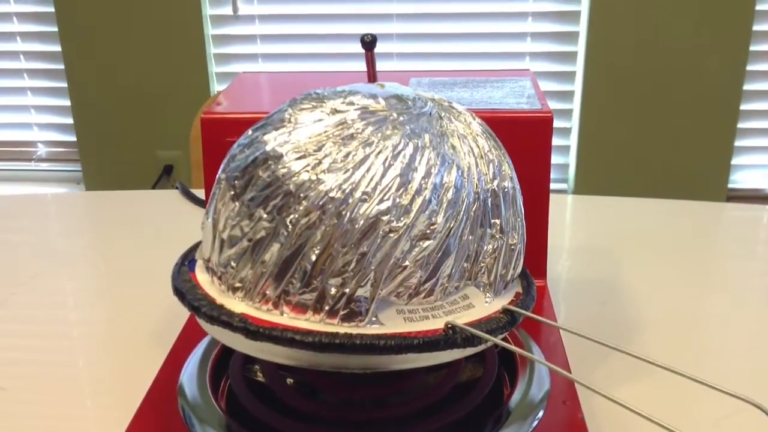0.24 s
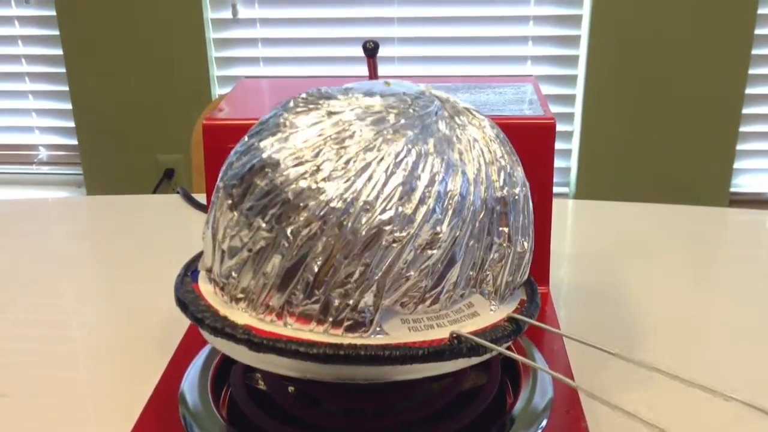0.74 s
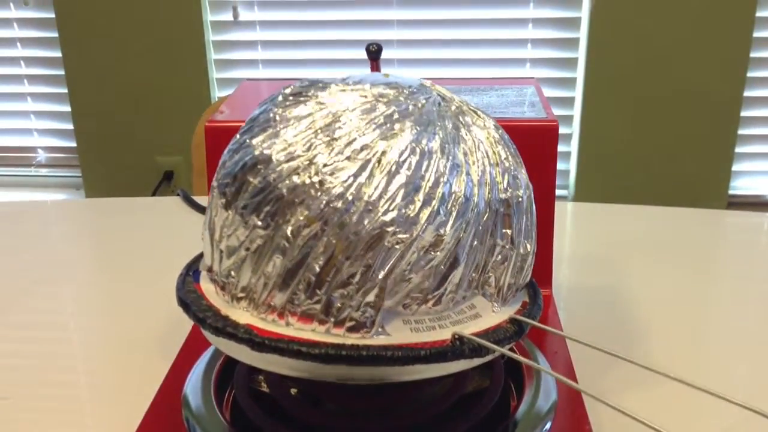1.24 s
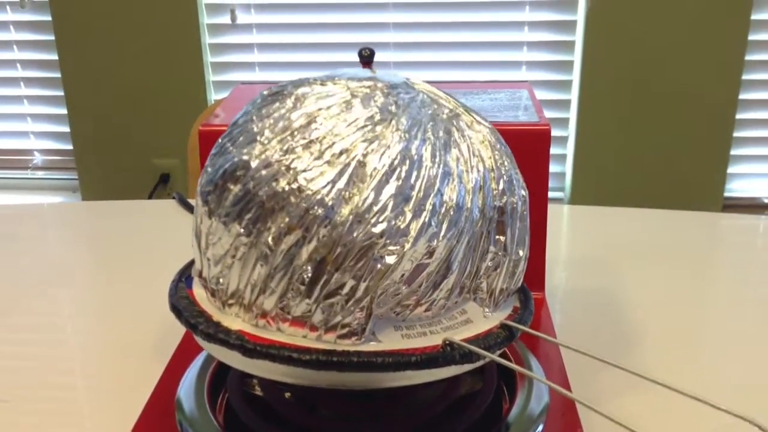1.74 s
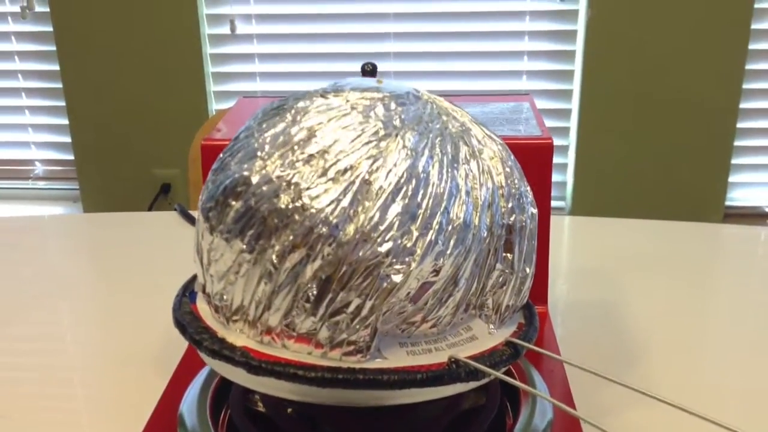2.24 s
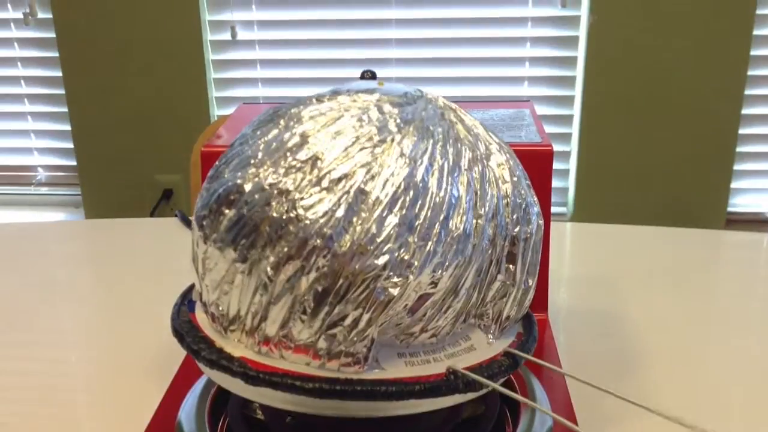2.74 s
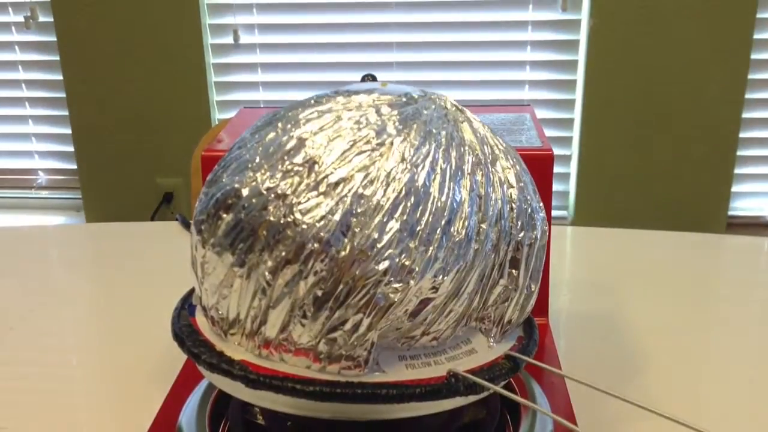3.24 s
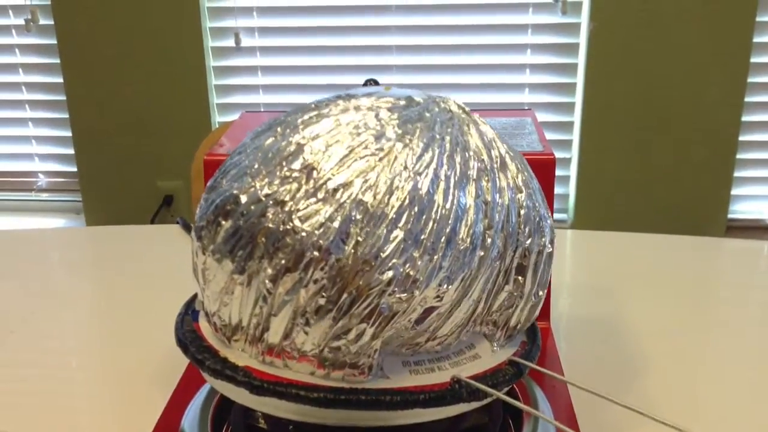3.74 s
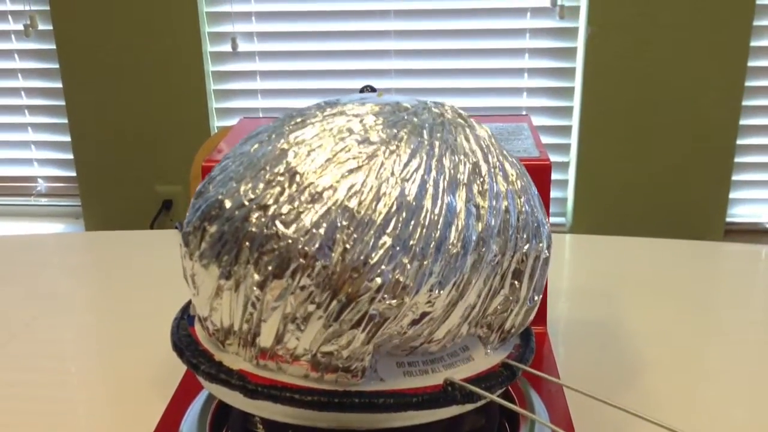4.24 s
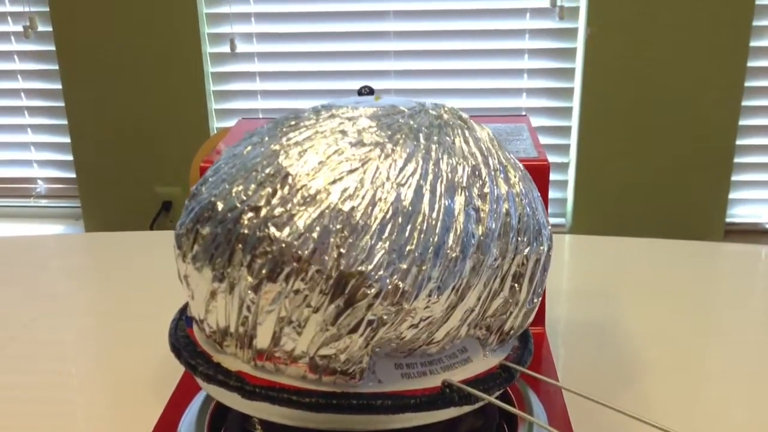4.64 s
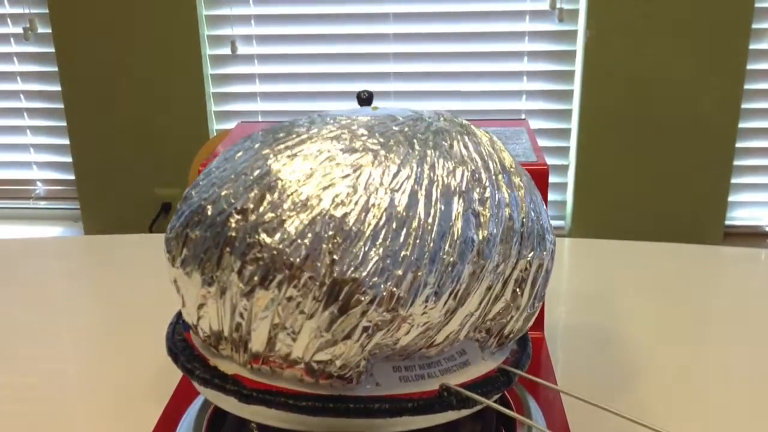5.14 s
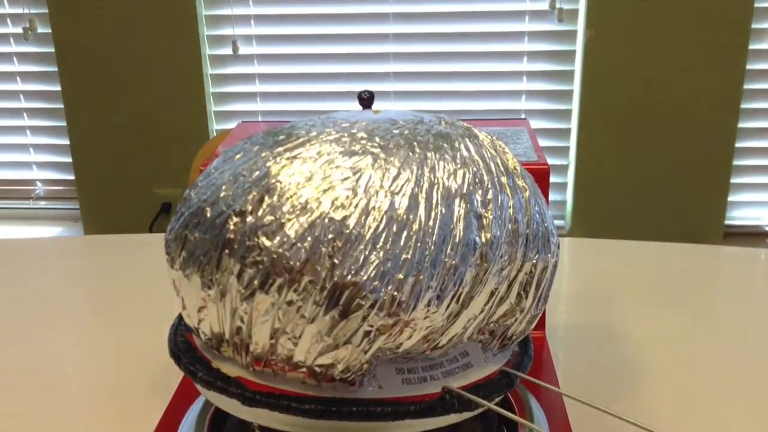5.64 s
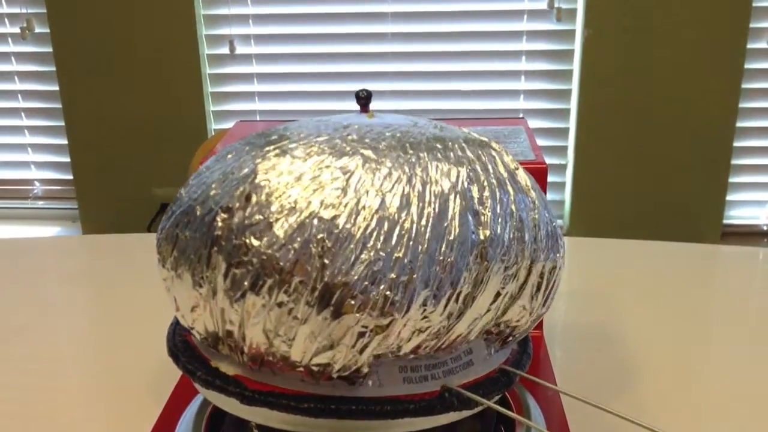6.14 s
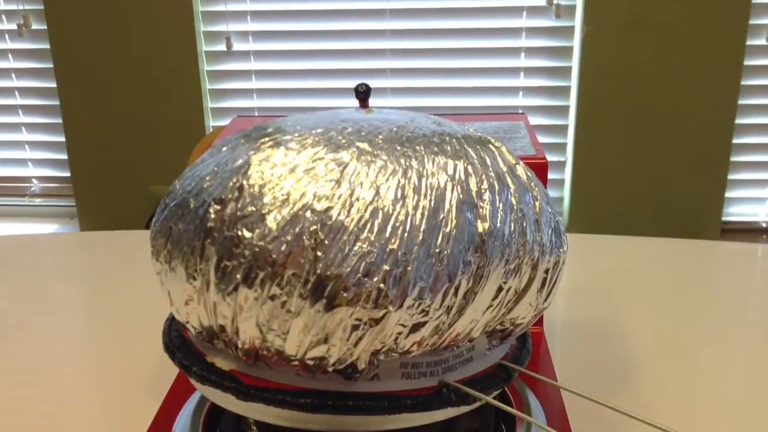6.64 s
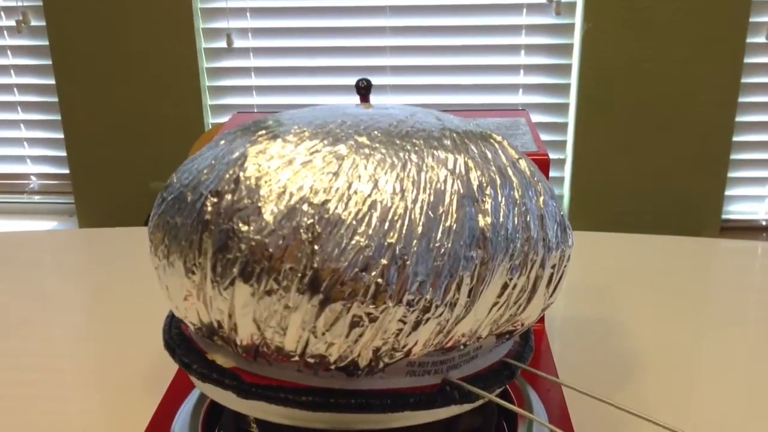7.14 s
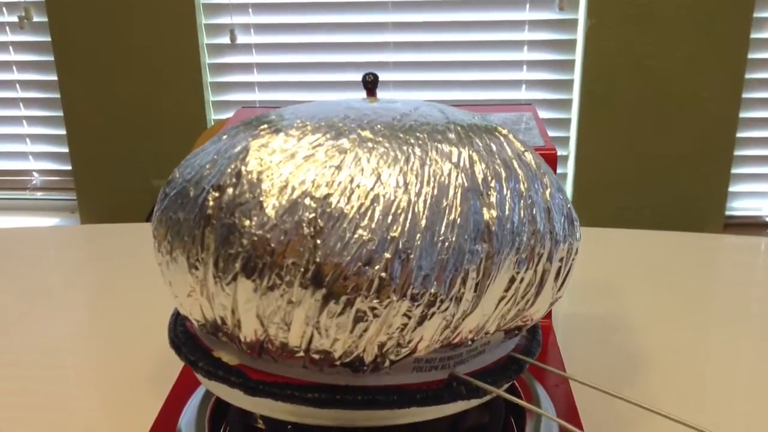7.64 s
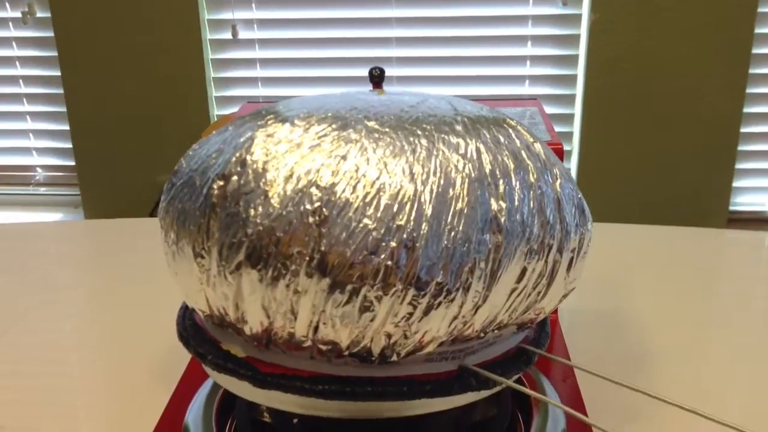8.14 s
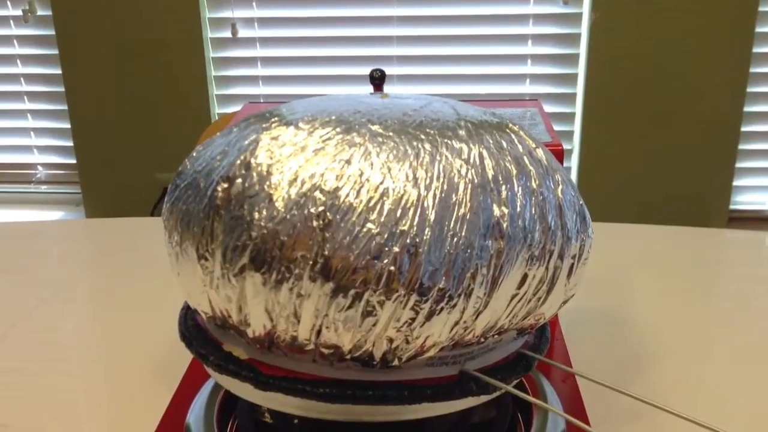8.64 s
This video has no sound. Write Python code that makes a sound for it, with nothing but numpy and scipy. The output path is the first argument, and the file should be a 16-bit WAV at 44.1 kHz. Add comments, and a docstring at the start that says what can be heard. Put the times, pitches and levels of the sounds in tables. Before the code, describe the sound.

Popcorn popping in a foil-domed pan, heard close in a hard-walled room. From 0 to 0.4 seconds there are quieter ticks and pops with small gaps; then loud cracks arrive and the popping stays busy. Each burst is a few milliseconds of dry, splintery snap with a short hollow knock on the foil, pitched differently every time, followed by a loose rattle of kernels and a brief room echo. From 1 to 5 seconds strong pops come singly and in quick pairs, with tiny uneven gaps. Around 5.8 and 6.7 seconds they bunch into crisp clusters, somewhat brighter and tinnier. Another tight flurry comes near 8 seconds, then strong pops continue until about 8.9, with no real thinning. The pan adds a boxy low-mid ring; deep bass is thin, the loudest cracks are rounded by the small microphone, and a very faint steady hiss lies beneath.

```python
"""A hard-walled room with an electric ring, where popcorn bursts under the foil dome of a pan.
Each burst is a crack of a few milliseconds, made of noise and a click, plus a short knock on the foil.
Thrown kernels follow as a rattle of uneven noise, and the room answers with fading noise.
All of it rings the pan and its air; a faint hiss lies below, and a small microphone rounds loud cracks.
"""
import sys
import numpy as np
from scipy import signal
from scipy.io import wavfile

SR = 44100
rng = np.random.default_rng(int(sys.argv[2]) if len(sys.argv) > 2 else 0)


def wrap_up_sound(samples):
    """Save the sound to the file named by the first command line argument, as 16-bit audio."""
    columns = np.atleast_2d(samples).T
    # keep every value between -1 and 1, then stretch to whole-number steps
    tamed = np.clip(columns, -1, 1)
    steps = np.round(tamed * 32767).astype(np.int16)
    wavfile.write(sys.argv[1], SR, steps)


N = 391608

# Bursts and knocks on the foil. Each row: start in seconds, level in dB,
# brightness in dB per octave, strongest pitch in Hz.
BURSTS = [(0.001, -22, -1, 720), (0.026, -22.5, -4, 330), (0.041, -22, -4, 1080.0), (0.08, -28.5, -5, 4700),
          (0.1655, -16.5, 4.5, 4020), (0.1708, -12.5, -4.5, 1130), (0.285, -33, 0, 1600),
          (0.31, -19, 3.5, 1720), (0.329, -18.5, -1, 1410), (0.336, -15, -3, 925), (0.37, -16, -1.4, 3340),
          (0.4424, -8.5, 0, 620), (0.637, -7.5, 1.5, 1150), (0.659, -10, -1, 2000), (0.743, -9, -0.7, 1230),
          (0.777, -10, 1.4, 810.0), (0.794, -11, -2.5, 1720), (0.803, -14.5, 0, 870),
          (0.868, -11, -2, 1650), (0.877, -10, 0, 313), (1.085, -15.5, -3, 2370.0),
          (1.107, -8.5, -0.8, 1140), (1.117, -20, 0, 4260), (1.126, -19, 1.5, 3400), (1.225, -9, 0, 870.0),
          (1.237, -13, -2.5, 3570), (1.319, -10.5, 0, 1630), (1.433, -10.5, 0.5, 1540),
          (1.454, -5.5, -2.5, 1190), (1.463, -11.5, 1, 3370), (1.49, -19.5, 1, 3040.0),
          (1.529, -10, 0.5, 1280), (1.553, -17, -4.5, 840.0), (1.593, -5, -2.2, 800), (1.606, -17, 1, 700),
          (1.726, -10.5, -1.5, 3730), (1.76, -8.5, 1.5, 3150), (1.795, -13, 0.5, 1450),
          (1.91, -12.5, -2.3, 1000), (1.978, -6.5, -2, 824), (2.148, -25, -3.5, 760.0),
          (2.186, -11.5, 1, 3400), (2.227, -10.5, 2, 1000), (2.311, -8, -3, 1730), (2.325, -29, -10, 630),
          (2.351, -19, -3, 583), (2.359, -16, -1.5, 2000), (2.443, -15, 0.5, 770),
          (2.571, -15, -3.5, 3760.0), (2.579, -20.5, -6.5, 630), (2.598, -8.5, -3, 3100),
          (2.709, -22, 0.5, 1590), (2.78, -6, -0.5, 1750), (2.786, -9.5, -1, 980),
          (2.858, -24.5, -6.5, 1720.0), (2.954, -7, -0.5, 1850), (3.077, -9, -0.5, 800),
          (3.119, -6.5, -3.5, 647), (3.1325, -27, -10, 670), (3.192, -28, 3.5, 1490.0),
          (3.2, -7.5, -3, 860), (3.253, -16, -3.5, 690), (3.3, -8.5, -5, 1810), (3.362, -6, -1.5, 1010),
          (3.374, -16.5, -6.5, 1100), (3.416, -10, -2, 1610), (3.482, -50, -1, 900), (3.615, -11, -3, 3200),
          (3.786, -6.5, 0.7, 840.0), (3.798, -5.5, 0, 3870), (3.815, -25, 6, 310.0),
          (3.834, -23, -2, 810.0), (3.911, -8.5, -1.3, 1950), (4.085, -9.5, -0.5, 298),
          (4.145, -6, -0.5, 1280), (4.1635, -21, 0, 3400), (4.18, -34, 2, 3600), (4.204, -7, -1, 3780),
          (4.214, -5, 0.5, 1610), (4.239, -17, 2, 1200.0), (4.286, -17, 1, 2000), (4.412, -13, 0.5, 1760),
          (4.432, -20, -1, 820), (4.448, -16.5, 2, 300.0), (4.461, -16.5, -3, 310), (4.563, -8.5, -2, 1070),
          (4.746, -10, 0, 1450), (4.79, -14.5, -0.5, 3350), (4.793, -16, -3.5, 1780), (4.894, -6, -2, 1440),
          (4.909, -19, -2, 700), (5.089, -13, -1, 1190), (5.1085, -6, 0.9, 900), (5.125, -9, -2, 1850),
          (5.2, -25, -4.5, 550.0), (5.367, -6, 0.4, 1720), (5.377, -11, 0.5, 3220), (5.39, -22, -2, 1800),
          (5.409, -25, 0.5, 1780.0), (5.56, -14, -3, 3180), (5.745, -9.5, -1.5, 3550),
          (5.8036, -15, 5, 1780), (5.816, -11.5, 2.5, 3360), (5.8195, -10, 0, 440), (5.84, -9, 1, 4320),
          (6.023, -6, 0.5, 560), (6.051, -10.5, 0.5, 1660), (6.089, -22, 1.5, 3500.0),
          (6.19, -15, 3.5, 3280), (6.248, -14.5, -2, 3500), (6.258, -22.5, -7, 1040),
          (6.272, -14.5, -2, 300), (6.2895, -10, -2, 800), (6.371, -15, -1, 1900), (6.483, -12.5, 0, 3760),
          (6.515, -13.5, -4, 5030), (6.564, -13.5, -1, 1600), (6.731, -12, 1, 3840),
          (6.736, -12.5, -4, 1780), (6.744, -21, -1, 1130), (6.748, -21, 0, 3470), (6.751, -8.5, -2, 1810),
          (6.765, -11, 0.5, 302), (6.778, -14, -0.5, 3470), (6.7889, -10, 0.5, 1640),
          (6.902, -15, -1.8, 3530), (6.908, -17, -2, 1550), (6.968, -10.5, 1, 1490),
          (6.975, -15.5, -6, 1080.0), (7.03, -9, 0.5, 660), (7.056, -12, -2, 624), (7.099, -12, 1, 4330),
          (7.194, -13.5, -0.3, 596), (7.292, -14.5, -4, 567), (7.301, -25, -0.5, 3470),
          (7.395, -11.5, -2, 1910), (7.406, -7.5, -0.3, 1710), (7.532, -17.5, 4, 4240),
          (7.54, -11.5, 2, 650), (7.586, -18, 4.5, 5100), (7.592, -13, -2.5, 1780),
          (7.651, -22.5, 0, 610.0), (7.68, -9, 1.2, 477), (7.727, -19.5, -0.5, 3470),
          (7.732, -9.5, 0.5, 1120), (7.775, -17, -0.5, 1930), (7.92, -8.5, 1, 1790), (7.937, -13, -3, 590),
          (7.979, -11.5, 0, 1430), (7.995, -10.5, 0.5, 485), (8.002, -9.5, 1.5, 990),
          (8.015, -7, 0.5, 1220), (8.028, -16, -3.5, 1340.0), (8.074, -13.5, -1, 1810),
          (8.128, -10.5, -0.6, 586), (8.241, -12, 0, 1980), (8.249, -21, -1, 2000), (8.302, -17, -1, 745),
          (8.365, -14.5, -0.8, 1870), (8.597, -12, 1, 2250), (8.606, -17, -0.5, 1780),
          (8.682, -9.5, 1, 3170), (8.696, -11.5, 0.7, 576), (8.794, -7.5, -3, 1760),
          (8.805, -5.5, 1.5, 1300), (8.869, -8.5, -1.5, 4440)]
# Colour of the parts of a burst. Each row: pitch in Hz, then crack, rattle and room echo in dB per Hz.
PART_COLOUR = [(227, -5, -10.5, -35.5), (740, -0.5, -2, -23.5), (1390, -3.5, 1, -29.5),
               (1840, -2.5, 2, -27), (2900, -23.5, -4.5, -32.5), (3263, -1.5, 5, -26.5),
               (5370, -12, -11.5, -36.5), (6100, -10, -11, -35.5), (10840, -21.5, -20.5, -45.5),
               (15100, -28, -24, -71)]
# Extra level of the low thump as time goes on. Each row: time in seconds, level in dB.
THUMP_LEVEL = [(0.5, 0), (2.2, -0.5), (3.3, -2), (4.2, 2), (4.9, -3), (5.7, 5.5), (6.2, 0), (8.5, -1)]
# How fast the parts die. Each row: pitch in Hz, then the seconds in which crack, rattle and room fall 60 dB.
FADE_TIMES = [(197, 0.009, 0.41, 0.76), (567, 0.0084, 0.21, 0.71), (2000, 0.012, 0.11, 0.83),
              (11500, 0.016, 0.091, 0.37)]
# Resonances of the pan and its enclosed air. Each row: pitch in Hz, width in Hz, level in dB.
PAN_MODES = [(216, 75, 1), (340.4, 24.6, 0), (544.5, 18.2, 4), (697, 25, -8), (815, 42, -8.5),
             (1680, 150, -9.5)]
# Colour of the room and microphone floor. Each row: pitch in Hz, level in dB per Hz (only relative).
HISS_COLOUR = [(170, -51), (1000, -2), (7000, -15)]
# First reflections from the walls. Each row: delay in seconds, level in dB, slope in dB per octave.
WALL_REFLECTIONS = [(0.0159, -18.5, -1.5), (0.019, -22.5, -3)]
# Edges of the frequency bands in Hz, wide enough for a sound to start at once
EDGES_HZ = np.r_[30, 280:1200:230, 1200 * 2 ** np.arange(0, 3.9, 1 / 4)]

BURST_S, BURST_DB, BRIGHT_DB, PITCH_HZ = np.transpose(BURSTS)

HISS_DB = -56   # average (rms) level of the floor
CRACK_DB, RATTLE_DB, ECHO_DB = 6, -4.5, 8.5   # added to the level of the burst
PIVOT_HZ = 1500   # brightness tilts the colour about this pitch
TILT_FROM_HZ = 500   # below this the tilt stays the same, and the thump level counts
RATTLE_TILT, ECHO_TILT = 0.35, 0.86   # share of the brightness that rattle and echo keep
PITCH_DB, PITCH_OCTAVES = 7, 0.17   # height and width of a burst's own resonance
CRACK_PITCH, ECHO_PITCH = 0.28, 0.53   # share of that resonance in crack noise and echo
UNEVEN_DB = 2.5   # chance differences from band to band
THUMP_FOLLOWS = 0.034   # dB of thump per dB of level: weak bursts are leaner
SETTLING = 0.6   # how lumpy late kernels make the echo
CREAK_DB, CREAK_DB_PER_OCTAVE = -54.5, 2   # faint ticks of the hot foil
BURST_SAMPLES = SR // 25   # room for one crack or knock: 40 ms
ONSET_DELAY_S = 0.0009   # crack and knock begin this long after the row's time
CRACK_RISE_S = 0.0004
SPLINTER_SAMPLES, GRIT_DB = 12, 4.5   # length and unevenness of the splinters in a crack
HULL_CLICK, HULL_DB_PER_OCTAVE = 11, 1.5   # click size beside the noise, and its rise with pitch
KNOCK_DB, KNOCK_RISE_CYCLES, KNOCK_T60_S = 5, 0.96, 0.013   # level is added to that of the burst
BASS_CUT_HZ, CUTOFF_HZ = 103, 15600


def from_db(db):
    """Turn a level in dB into a gain."""
    return 10 ** (np.asarray(db) / 20)


def at_hz(rows, hz):
    """Read the columns of a table at one pitch, on a logarithmic pitch axis."""
    known_hz, *columns = np.transpose(rows)
    return [np.interp(np.log(hz), np.log(known_hz), column) for column in columns]


def band(x, low, high):
    """Let only one band of frequencies through."""
    return signal.sosfilt(signal.butter(2, [low, high], "band", fs=SR, output="sos"), x)


def hiss():
    """Room and microphone floor: steady noise, coloured band by band."""
    white = rng.standard_normal((2, N))
    out = np.zeros(N)
    for k, (low, high) in enumerate(zip(EDGES_HZ[::2], EDGES_HZ[2::2])):
        gain = from_db(at_hz(HISS_COLOUR, low)[0])
        out += gain * band(white[k % 2], low, high)   # neighbouring bands use separate noise
    return from_db(HISS_DB) * out / np.sqrt(np.mean(out ** 2))


def strikes(level_db):
    """Place one click for each burst, at the given levels."""
    clicks = np.full(N, 1e-18)
    at = np.clip((BURST_S * SR).astype(int), 0, N - 1)
    clicks[at] = from_db(level_db)
    return clicks


def swell(clicks, rise_s, t60):
    """Turn clicks into envelopes that rise quickly and die away; where they overlap, power adds up."""
    up = np.exp(-1 / (rise_s * SR))
    down = from_db(-120 / (t60 * SR))   # 120, because this fades the power
    power = signal.lfilter([1 - up], np.convolve([1, -up], [1, -down]), clicks ** 2)
    return np.sqrt(power)


def room_echo(level_db, t60):
    """Loudness curve of the room's answer, which sums the fading echoes of all bursts."""
    return swell(strikes(level_db + ECHO_DB), 0.00083, t60)


def foil_rattle(level_db, t60):
    """Loudness curve of kernels rattling on the foil, which builds and fades after each burst."""
    return swell(strikes(level_db + RATTLE_DB), 0.0053, t60)


def tumbling(per_s, spread_db, touch_s):
    """Uneven loudness of kernels landing at random: each touch fades quickly; the average (rms) is 1."""
    sizes = from_db(spread_db * np.minimum(rng.exponential(1, N), 3))
    hits = rng.random(N) < per_s / SR
    fade = np.exp(-1 / (touch_s * SR))
    touches = signal.lfilter([1], [1, -fade], sizes * hits)
    return touches / np.sqrt(np.mean(touches ** 2))


def placed(bursts):
    """Lay each row of samples down at its burst, a fixed moment after the row's time."""
    starts = ((BURST_S[:, None] + ONSET_DELAY_S) * SR).astype(int)
    at = starts + np.arange(bursts.shape[1])
    return np.bincount(at.ravel(), bursts.ravel(), N)[:N]


def reflected(x, octaves):
    """The nearest walls send a sound back a little later, each with its own colour."""
    out = x.copy()
    for delay_s, level_db, slope_db in WALL_REFLECTIONS:
        later = np.r_[np.zeros(int(delay_s * SR)), x][:N]
        out += from_db(level_db + slope_db * octaves) * later
    return out


def splitting_hulls():
    """A hull splits with one sharp click among splinters, which are noise of uneven size."""
    count = len(BURST_S)
    noise = rng.standard_normal((count, 2, BURST_SAMPLES))
    sizes = rng.standard_normal((count, 1, BURST_SAMPLES // SPLINTER_SAMPLES))
    splinters = np.repeat(sizes, SPLINTER_SAMPLES, axis=2)
    hull = np.zeros((count, BURST_SAMPLES))
    hull[:, 8] = HULL_CLICK * np.sign(splinters[:, 0, -1])   # push or pull by chance
    return noise * from_db(GRIT_DB * splinters), hull


def cracks(level_db, split, low, high, t60):
    """In one band, each crack is a short burst whose energy is set by its level."""
    t = np.arange(BURST_SAMPLES) / SR
    shape = np.sqrt(1 - np.exp(-t / CRACK_RISE_S)) * from_db(-60 * t / t60)
    bursts = band(split * shape, low, high)
    energy = np.sum(bursts ** 2, axis=1)
    gain = from_db(level_db) * np.sqrt((high - low) * t60 / energy)
    return placed(bursts * gain[:, None])


def knocks():
    """Each burst knocks the foil, which rings a few cycles at the burst's own pitch."""
    pitch_hz = PITCH_HZ[:, None]
    t = np.arange(BURST_SAMPLES) / SR
    octaves = np.log2(np.maximum(pitch_hz, TILT_FROM_HZ) / PIVOT_HZ)
    level_db = BURST_DB[:, None] + KNOCK_DB + BRIGHT_DB[:, None] * octaves
    shape = (1 - np.exp(-t * pitch_hz / KNOCK_RISE_CYCLES)) * from_db(-60 * t / KNOCK_T60_S)
    phase = 2 * np.pi * (pitch_hz * t + rng.random(pitch_hz.shape))
    return reflected(placed(from_db(level_db) * shape * np.sin(phase)), 0)


def popping():
    """Build cracks, rattle, creaks and echo from noise that dies band by band, coloured by each burst."""
    white = rng.standard_normal((2, 2, N))
    splinters, hull = splitting_hulls()
    thump_db = np.interp(BURST_S, *np.transpose(THUMP_LEVEL))
    thump_db = thump_db + THUMP_FOLLOWS * (BURST_DB - np.median(BURST_DB))
    uneven_db = UNEVEN_DB * rng.standard_normal((len(BURST_S), len(EDGES_HZ)))
    landing = tumbling(per_s=350.0, spread_db=3.5, touch_s=0.004)
    late_landing = tumbling(per_s=50.0, spread_db=4.0, touch_s=0.003)
    out = np.zeros(N)
    for k, (low, high) in enumerate(zip(EDGES_HZ, EDGES_HZ[1:])):
        hz = np.sqrt(low * high)
        crack_db, foil_db, room_db = at_hz(PART_COLOUR, hz)
        crack_t60, rattle_t60, room_t60 = at_hz(FADE_TIMES, hz)
        octaves = np.log2(hz / PIVOT_HZ)
        tilt_db = BRIGHT_DB * np.log2(max(hz, TILT_FROM_HZ) / PIVOT_HZ)
        away = np.log2(hz / PITCH_HZ) / PITCH_OCTAVES
        own_db = PITCH_DB * np.exp(-0.5 * away ** 2)
        level_db = BURST_DB + thump_db * (hz < TILT_FROM_HZ)

        split_db = level_db + CRACK_DB + tilt_db + CRACK_PITCH * own_db + crack_db + uneven_db[:, k]
        split = splinters[:, k % 2] + hull * from_db(HULL_DB_PER_OCTAVE * octaves)
        out += reflected(cracks(split_db, split, low, high, crack_t60), octaves)

        tail_db = level_db + uneven_db[:, k - 1] / 2   # no two tails ring alike
        rattle = foil_rattle(tail_db + RATTLE_TILT * (tilt_db + own_db) + foil_db, rattle_t60)
        echo = room_echo(tail_db + ECHO_TILT * tilt_db + ECHO_PITCH * own_db + room_db, room_t60)
        late = np.roll(late_landing, k // 3 * SR)   # each late kernel pings in a few bands only
        creaks = late * from_db(foil_db + CREAK_DB + CREAK_DB_PER_OCTAVE * octaves)
        near, far = white[k % 2]
        on_foil = (landing * rattle + creaks) * near
        in_room = (1 + SETTLING * late) * echo * far   # the last kernels settle inside the echo
        out += band(on_foil + in_room, low, high)
    return out


def pan(x):
    """Ring the pan and its air: each mode is a narrow resonance, added to the sound that drives it."""
    out = x.copy()
    for hz, width_hz, level_db in PAN_MODES:
        r = np.exp(-np.pi * width_hz / SR)
        top = from_db(level_db) * (1 - r * r) / 2
        out += signal.lfilter([top, 0, -top], [1, -2 * r * np.cos(2 * np.pi * hz / SR), r * r], x)
    return out


def scene():
    """Put the pan in its room over the faint floor."""
    return (hiss() + pan(popping() + knocks()))[None]


def record(dry):
    """The microphone drops the bass, rounds the loudest cracks near full scale and cuts the top."""
    lean = signal.sosfilt(signal.cheby2(4, 19, BASS_CUT_HZ, "high", fs=SR, output="sos"), dry)
    rounded = lean / (1 + np.abs(lean) ** 6) ** (1 / 6)
    dull = signal.sosfilt(signal.cheby2(8, 22, CUTOFF_HZ, fs=SR, output="sos"), rounded)
    return signal.sosfilt(signal.cheby2(12, 50, 16700, fs=SR, output="sos"), dull)


dry = scene()
out = record(dry)
wrap_up_sound(out)
```